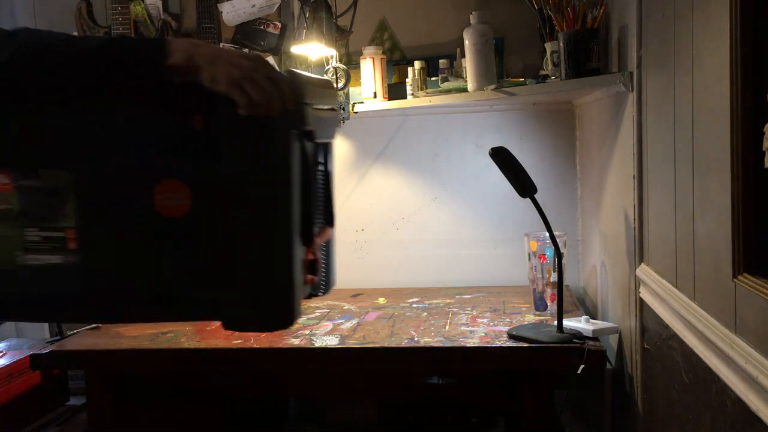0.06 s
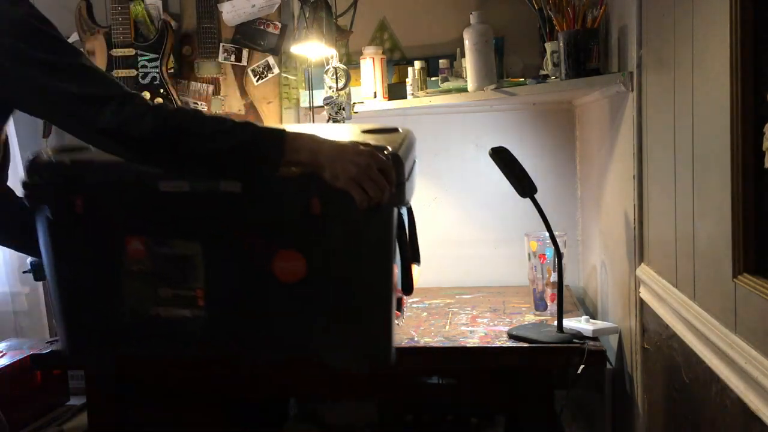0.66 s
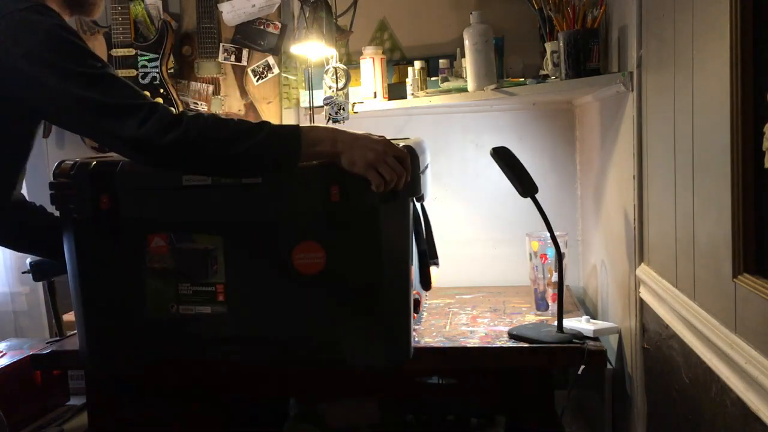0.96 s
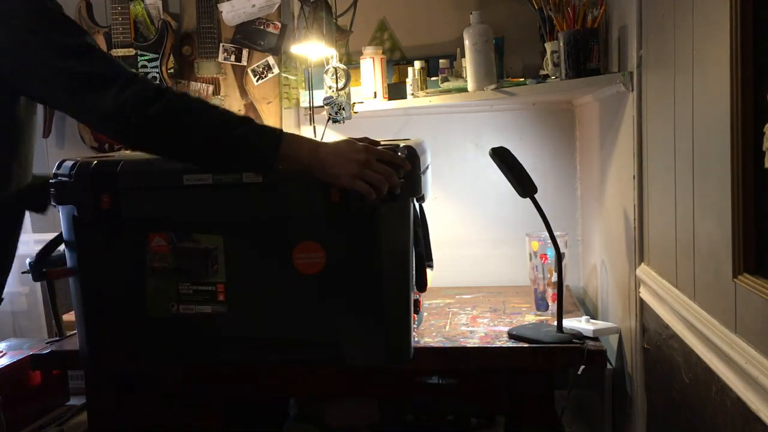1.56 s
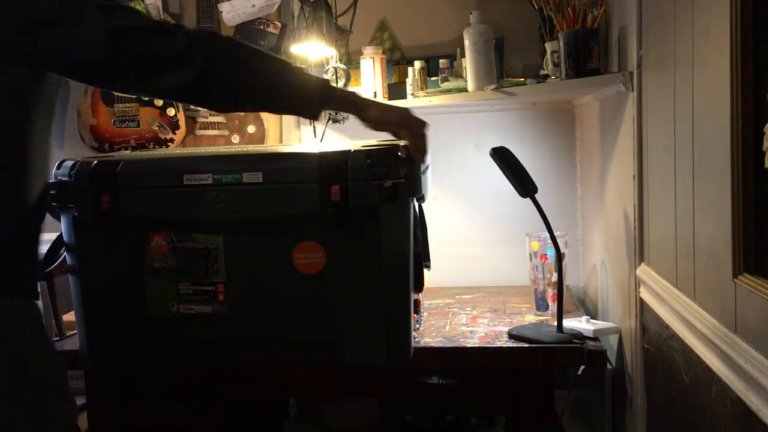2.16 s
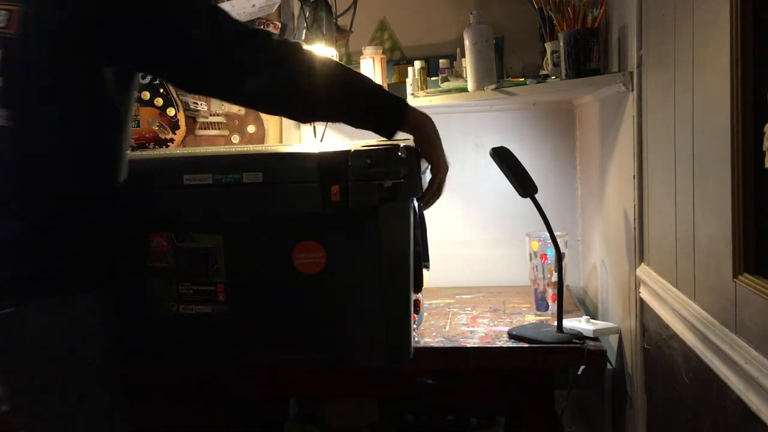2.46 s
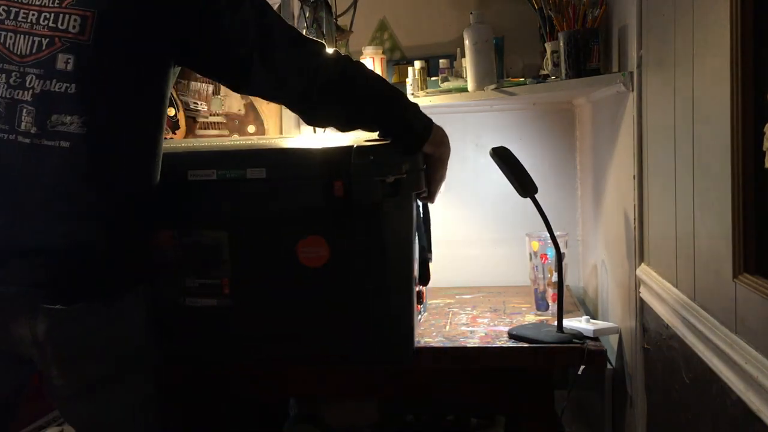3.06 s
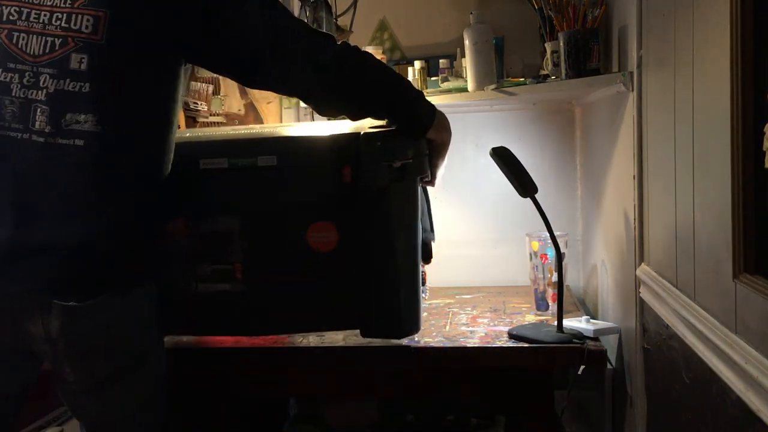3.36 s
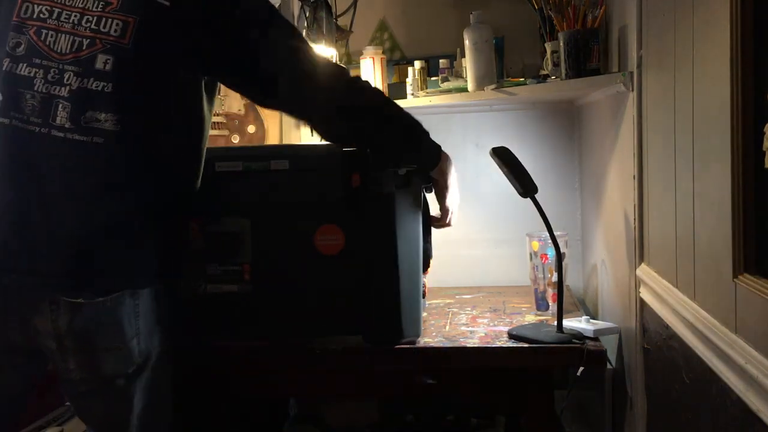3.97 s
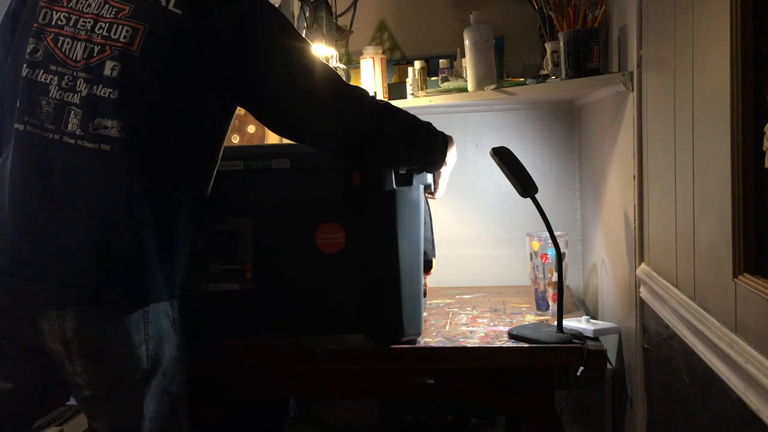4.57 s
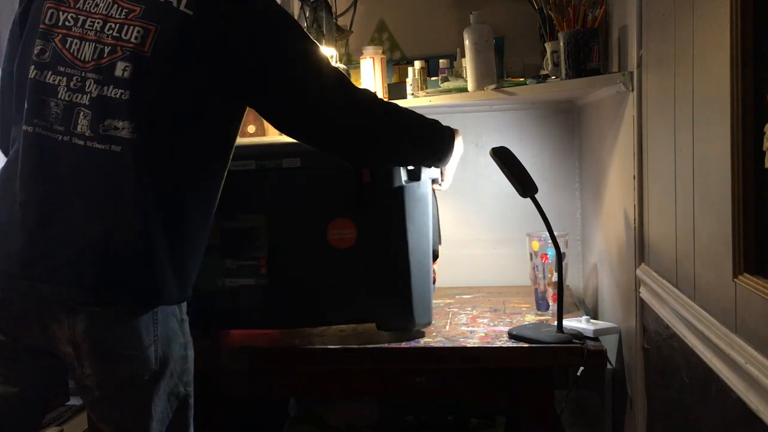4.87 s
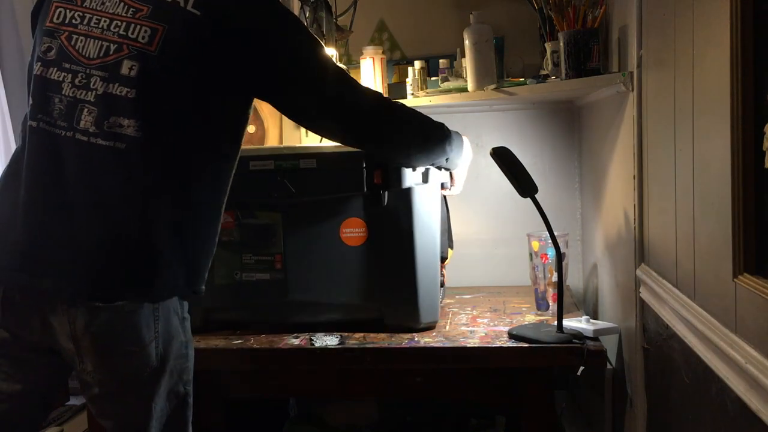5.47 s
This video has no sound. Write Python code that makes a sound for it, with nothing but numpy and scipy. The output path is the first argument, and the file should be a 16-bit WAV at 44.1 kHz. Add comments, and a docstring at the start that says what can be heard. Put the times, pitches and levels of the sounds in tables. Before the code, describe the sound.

A low electric hum and faint room air run throughout, in a small workshop with a short echo. At about 0.7 seconds a heavy hard plastic cooler lands on a wooden workbench in a loud cluster of dull, hollow thumps, with a sharp latch click and a brief juddering scrape, settling by 1 second. From there to about 2.5 seconds come quiet hand knocks on the lid, small clicks and soft rubbing of hands and sleeves. Handles clack lightly against the shell between 2.6 and 3.4 seconds. Around 3.6 seconds the cooler is shoved and lands heavily again, with a low scrape and a handle clack. Lighter hollow knocks, clicks and clacks follow from 4.1 to 4.9 seconds. A last group of heavy thumps with a short rub comes between 5.1 and 5.4 seconds and dies quickly into the hum.

```python
"""Heavy, hollow thumps: a hard plastic cooler is set down on a wooden workbench, then lifted and shoved
twice more. Each landing is a cluster of impacts that excite the modes of the bench and the shell.
Hands knock on the lid, handles clack and latches click, all with the short echo of a small workshop.
Sliding hands and sleeves add friction noise; a low electric hum and faint room air lie underneath."""
import sys
import numpy as np
from scipy import signal
from scipy.fft import rfft, irfft
from scipy.io import wavfile
from scipy.ndimage import uniform_filter1d

SR = 44100
rng = np.random.default_rng(int(sys.argv[2]) if len(sys.argv) > 2 else 0)


def unload_audio(sound):
    """Save the sound as a 16-bit wav file, at the path given as the first command line argument."""
    columns = np.transpose(np.atleast_2d(sound))
    # keep every value between -1 and 1, then stretch to whole-number steps
    steps = np.round(np.clip(columns, -1, 1) * 32767)
    wavfile.write(sys.argv[1], SR, steps.astype(np.int16))


N = 243550

EDGES_HZ = 22 * 2 ** np.arange(0, 9.6, .5)   # half-octave bands
CENTRES_HZ = np.sqrt(EDGES_HZ[1:] * EDGES_HZ[:-1])
BOOM_HZ, THUD_HZ, HOLLOW_HZ = (25, 110), (110, 260), (260, 750)
CLACK_HZ, SNAP_HZ = (750, 3500), (3500, 16500)
BLOW_RANGES_HZ = [THUD_HZ, HOLLOW_HZ, CLACK_HZ, SNAP_HZ]
MIDDLE_SPOT_HZ = 300.6   # struck spots pitched above this trade thud for hollow ring
RING_TIME_S = np.arange(SR * 2 // 5) / SR
ATTACK_SAMPLES = SR // 40   # an impact's level is set over this opening stretch


def landings(bank):
    """Impact excitation: the heavy base lands foot by foot and its weight sets the bench booming."""
    # start_s, level_db, boom_db (relative to the level), hardness_db, pitch_hz
    impacts = [(0.7, -23, -6.5, 9, 268), (0.715, -16, 1, 2.5, 329), (0.732, -30, 11.5, 16.5, 149),
               (0.768, -29.5, -17, 11, 260), (0.784, -26, 4, 9, 230), (0.79, -26.5, 2.5, 13.5, 240),
               (0.803, -26, 4, -11.5, 192), (0.871, -31, 0, 0, 240), (0.881, -25, -5, 3, 257),
               (0.925, -29.5, -18, -1, 287), (0.984, -37, -12, 10, 296), (1.005, -33, 3, -20, 310),
               (3.106, -37, -1, -1.5, 391), (3.119, -41, -1, -3, 218), (3.576, -18.5, 0, -5, 287),
               (3.597, -23, -8, 0, 300), (3.623, -27, -3, 5.5, 247), (3.686, -26, 1, -6.5, 199),
               (3.699, -22.5, -4.5, -2, 187), (3.734, -34.5, 4, 12.5, 212), (3.766, -27, -11, -12, 318),
               (4.536, -41.5, 10, -0.5, 156), (4.602, -41, 7.5, -11, 228), (5.123, -43, 3, 5, 370),
               (5.135, -38, 11, -1.5, 246), (5.224, -29.5, -13, -7.5, 190), (5.283, -34.5, 8, 1, 160),
               (5.292, -23, -5, 7, 196), (5.303, -20, -6.5, -21, 230), (5.33, -28.5, -6, 4.5, 192),
               (5.377, -31.5, -2, 4.5, 180)]
    # thud_db, hollow_db, clack_db, snap_db, relative to the level
    balance_db = [-1.72, 0.17, -11, -20.5]
    out = np.zeros(N)
    for start_s, level_db, boom_db, hardness_db, pitch_hz in impacts:
        ringing = body_modes(bank, decay_scale=0.71, crowd_db=-3.0, spread_db=0.5)
        ringing = resonate(coupled_handles(ringing), pitch_hz, q=7.6, boost_db=2.0)
        trade_db = 6.5 * np.log2(pitch_hz / MIDDLE_SPOT_HZ)
        levels_db = [level_db + boom_db, *blow_levels(balance_db, level_db, hardness_db, trade_db)]
        rise_s = rise_time(0.0011, hardness_db)
        add(out, start_s, contact(ringing, [BOOM_HZ, *BLOW_RANGES_HZ], levels_db, rise_s))
    return out


def hand_knocks(bank):
    """Damped impact: a hand rings the hollow shell briefly, too lightly to make the bench boom."""
    # start_s, level_db, hardness_db, pitch_hz
    impacts = [(0.078, -65.5, -6, 270), (1.144, -42.5, -28, 290), (1.286, -41, 1, 445),
               (1.584, -60, 8.5, 447), (1.784, -60, 6, 445), (1.861, -47, -11, 268),
               (1.897, -40, -14.5, 325), (1.925, -49, -18, 308), (2.023, -53.5, -7, 245),
               (2.215, -54.5, -3.5, 334), (2.397, -55, -9, 296), (2.535, -50.5, -18, 280),
               (2.622, -51.5, -11, 320), (2.694, -49.5, 5.5, 312), (3.469, -48, 5, 426),
               (3.839, -60, 18, 240), (4.137, -37, 5, 427), (4.176, -32.5, -16, 326),
               (4.392, -41.5, 2.5, 454), (4.415, -39, -24, 289), (4.47, -49, -23, 208)]
    # thud_db, hollow_db, clack_db, snap_db, relative to the level
    balance_db = [-1.2, -0.53, -8, -20.5]
    out = np.zeros(N)
    for start_s, level_db, hardness_db, pitch_hz in impacts:
        ringing = body_modes(bank, decay_scale=0.63, crowd_db=1.0, spread_db=0.0)
        ringing = resonate(coupled_handles(ringing), pitch_hz, q=7.9, boost_db=3.5)
        trade_db = 11 * np.log2(pitch_hz / MIDDLE_SPOT_HZ)
        levels_db = blow_levels(balance_db, level_db, hardness_db, trade_db)
        add(out, start_s, contact(ringing, BLOW_RANGES_HZ, levels_db, rise_time(0.0015, hardness_db)))
    return out


def handle_knocks(bank):
    """Stiff impact favours high modes: a swinging handle hits the shell with more clack than thud."""
    # start_s, level_db, hardness_db, pitch_hz
    impacts = [(2.575, -41, 2.5, 1430), (2.752, -59, 4, 1320), (2.826, -44.5, 0, 1330),
               (2.987, -50.5, -7.5, 1570), (3.117, -41.5, 7, 2250), (3.286, -52.5, -0.5, 1800),
               (3.333, -48, 2.5, 2020), (3.699, -33, 5.5, 1430), (4.537, -47, 1, 1370),
               (4.693, -46.5, 2.5, 1360), (4.805, -45.5, -0.5, 1400)]
    # thud_db, hollow_db, clack_db, snap_db, relative to the level
    balance_db = [-10.5, -4, 0, -16]
    out = np.zeros(N)
    for start_s, level_db, hardness_db, pitch_hz in impacts:
        ringing = body_modes(bank, decay_scale=0.53, crowd_db=4.0, spread_db=3.5)
        ringing = resonate(coupled_handles(ringing), pitch_hz, q=5.6, boost_db=1.0)
        levels_db = blow_levels(balance_db, level_db, hardness_db, trade_db=0)
        add(out, start_s, contact(ringing, BLOW_RANGES_HZ, levels_db, rise_s=0.0014))
    return out


def latch_clicks(bank):
    """Free vibration of small hard parts: latches and fittings snap on the shell and ring high."""
    # start_s, level_db, brightness_db, pitch_hz, t60_s
    clicks = [(0.367, -69.5, -20, 1880, 0.15), (0.791, -31.5, -19, 2950, 0.087),
              (1.013, -53, 6, 1820, 0.15), (1.077, -55, 9, 2600, 0.1), (1.084, -47.5, 9.5, 2270, 0.12),
              (1.092, -44, -0.5, 3840, 0.15), (1.267, -49.5, -8.5, 2220, 0.12), (1.392, -53, 9, 4670, 0.13),
              (1.428, -51.5, -4.5, 1890, 0.13), (1.732, -62.5, -5, 1750, 0.22), (1.89, -57, 6, 2590, 0.1),
              (2.005, -58.5, -0.5, 1320, 0.11), (2.133, -61, -8, 1650, 0.071),
              (2.374, -62.5, 3, 1880, 0.19), (2.577, -45.5, -7.5, 3580, 0.095),
              (3.448, -52, 6.5, 3170, 0.25), (3.479, -52, 15, 4060, 0.16), (3.946, -49, -1, 2320, 0.18),
              (4.113, -57.5, 1, 2170, 0.26), (4.379, -55, -3.5, 3050, 0.05), (4.454, -50, 3, 3760, 0.19),
              (4.75, -58.5, -11, 3240, 0.14), (4.906, -57, -2, 2950, 0.14)]
    # spectrum of the fittings: frequency_hz, density_db
    spectrum = [(700, -4), (1700, 1), (2300, 3.5), (2750, 3), (3300, 2), (4200, -4.5), (5200, -2),
                (6500, -4.5), (7600, -2), (8700, -3.5), (11000, -11), (15000, -17)]
    # clack_db, snap_db, top_db, relative to the level
    balance_db = [1.45, -3.5, -25]
    # part of the brightness each range receives: clack_share, snap_share, top_share
    brightness_share = [0, 0.81, 1.96]
    ranges_hz = [CLACK_HZ, (3500, 9000), (9000, 16500)]
    out = np.zeros(N)
    for start_s, level_db, brightness_db, pitch_hz, t60_s in clicks:
        ringing = resonate(crowded_modes(bank, spectrum, t60_s), pitch_hz, q=11.0, boost_db=3.5)
        levels_db = level_db + np.array(balance_db) + brightness_db * np.array(brightness_share)
        add(out, start_s, contact(ringing, ranges_hz, levels_db, rise_s=0.00031))
    return out


def body_modes(bank, decay_scale, crowd_db, spread_db):
    """Modal superposition: struck bench and cooler ring as damped sines over a crowd of dense modes."""
    # bench top, enclosed air and wall panels: frequency_hz, level_db, t60_s (before decay_scale)
    modes = [(39.6, -2.5, 0.47), (49, -1.5, 0.92), (59.4, 0.5, 0.42), (95.5, 4.5, 0.14), (130.7, -8, 0.32),
             (171.7, -2, 0.35), (196.2, -3.5, 0.42), (244.7, -6.5, 0.061), (297.7, -5.5, 0.25),
             (344.3, 6.5, 0.087), (436.6, -7, 0.29), (499, -0.5, 0.13), (538, -6, 0.053), (592, -7.5, 0.28),
             (667.6, -20.5, 0.63), (1084, -13.5, 0.06), (1090, -12.5, 0.11), (1338, -6, 0.11),
             (1590, -9.5, 0.21), (1770, -19.5, .14), (1805, -15, 0.097), (2000, -13, 0.28),
             (2223, -17, 0.16), (2180, -30.5, 0.089), (2560, -42, 0.065), (3092, -14.5, 0.16),
             (3360, -25.5, 0.037)]
    # dense modes of shell and bench: frequency_hz, density_db
    crowd_spectrum = [(30, -8.5), (55, 4.5), (100, -0.5), (300, -8.5), (550, -12.5), (850, -15),
                      (1500, -15.5), (2300, -20.5), (3100, -28), (4700, -54.5), (6300, -51), (9000, -51.5),
                      (15000, -57)]
    # their decay: frequency_hz, t60_s (before decay_scale)
    crowd_decay = [(40, 0.2), (300, 0.24), (1500, 0.31), (5000, 0.12), (15000, 0.2)]
    hz, level_db, t60_s = np.transpose(modes)
    # the bench is always pushed the same way; the wall panels may start in or out
    sign = np.where(hz < THUD_HZ[1], 1, rng.choice([-1, 1], len(hz)))
    strength = sign * from_db(level_db + spread_db * rng.standard_normal(len(hz)))
    decays = fade(RING_TIME_S, decay_scale * t60_s[:, None])
    tones = strength @ (np.sin(2 * np.pi * hz[:, None] * RING_TIME_S) * decays)
    crowd = crowded_modes(bank, crowd_spectrum, decay_scale * at_hz(crowd_decay, CENTRES_HZ))
    return unit_attack(tones) + from_db(crowd_db) * crowd


def crowded_modes(bank, spectrum, t60_s):
    """Modal overlap: modes too close to tell apart ring like decaying bands of noise."""
    start = rng.integers(N - len(RING_TIME_S))
    rings = bank[:, start:start + len(RING_TIME_S)] * fade(RING_TIME_S, np.reshape(t60_s, (-1, 1)))
    return unit_attack(from_db(at_hz(spectrum, CENTRES_HZ)) @ rings)


def coupled_handles(ringing):
    """Sympathetic vibration: a blow on the shell also shakes the handles and their fittings."""
    # frequency_hz, width_hz, boost_db
    resonances = [(1399, 140, -6.5), (1797, 46, -7.5), (2273, 350, -11), (3250, 85, -19), (3510, 110, -9),
                  (6420, 1200, 6), (9000, 690, 4.5)]
    for hz, width_hz, boost_db in resonances:
        ringing = resonate(ringing, hz, hz / width_hz, boost_db)
    return ringing


def resonate(x, hz, q, boost_db):
    """Resonance: a part reinforces the vibration near its own pitch."""
    return x + from_db(boost_db) * signal.lfilter(*signal.iirpeak(hz, q, fs=SR), x)


def contact(ringing, ranges_hz, levels_db, rise_s):
    """Finite contact time: the ringing builds up with the force, each range to its own level."""
    build_up = (1 - np.exp(-RING_TIME_S / rise_s)) ** 2
    die_out = 1 - (RING_TIME_S / RING_TIME_S[-1]) ** 10
    blow = ringing * build_up * die_out
    return sum(from_db(db) * unit_attack(band(blow, edges)) for edges, db in zip(ranges_hz, levels_db))


def blow_levels(balance_db, level_db, hardness_db, trade_db):
    """Spectral tilt: a harder contact lifts the upper ranges; the trade turns thud into hollow ring."""
    # part of the hardness each range receives: thud_share, hollow_share, clack_share, snap_share
    hardness_share = [0, 0.16, 0.68, 1]
    tilt_db = hardness_db * np.array(hardness_share) + trade_db * np.array([-1, 1, 0, 0])
    return level_db + np.array(balance_db) + tilt_db


def rise_time(usual_s, hardness_db, halving_db=38):
    """Contact stiffness: the harder the contact, the sooner its force builds."""
    return usual_s * 2 ** (-hardness_db / halving_db)


def rubbing():
    """Sliding friction: hands and base judder and scuff on plastic and wood while sleeves rustle."""
    # start_s, length_s, level_db, pressure_db (judder offset), sleeve_db (rustle offset)
    strokes = [(0, 0.027, -63.5, -2.5, -11), (0.578, 0.079, -65.5, 2, 4), (0.64, 0.055, -56, -4, 9),
               (0.76, 0.17, -43, 9.5, -6), (1.029, 0.07, -53, 6, 7), (1.296, 0.22, -60.5, 2.5, 3),
               (1.506, 0.2, -64, -1, 5.5), (1.863, 0.18, -69, 13, 9), (2.076, 0.061, -60.5, 3, 5.5),
               (2.186, 0.091, -64, 8, 7), (2.48, 0.18, -61, 7.5, 8), (2.762, 0.087, -63.5, 4, -4),
               (2.96, 0.044, -65, 1, -9), (3.362, 0.13, -55, -4, 0), (3.462, 0.048, -62.5, -12, 13.5),
               (3.57, 0.2, -43, 10.5, -2), (3.84, 0.19, -64, -10, 6), (4.076, 0.05, -54, -4, 0),
               (4.137, 0.14, -54.5, 5.5, -2.5), (4.303, 0.16, -60, -10, -5.5), (4.68, 0.2, -70.5, 3.5, 0),
               (5.148, 0.16, -54, 2, -6), (5.295, 0.14, -57.5, 14, 9)]
    # low rub under pressure: frequency_hz, density_db
    judder_spectrum = [(150, -0.5), (240, -3.5), (310, -1.5), (420, -7), (510, -13.5), (620, -8.5),
                       (900, -33.5), (2000, -27.5)]
    # midrange scrape: frequency_hz, density_db
    scuff_spectrum = [(500, 1.5), (900, 6), (1450, 5.5), (1800, 4), (2300, 5), (3300, -21), (5000, -40)]
    # hiss of sleeves: frequency_hz, density_db
    cloth_spectrum = [(2500, 6), (3900, 4.5), (5000, -7.5), (6400, -1), (9500, -8.5), (11000, -9.5),
                      (15000, -9)]
    compression = 0.72   # sleeves and finger catches swing less in level than the scuff
    sliding, pressing, sleeves = np.zeros((3, N))
    for start_s, length_s, level_db, pressure_db, sleeve_db in strokes:
        motion = from_db(level_db) * stroke(start_s, length_s)
        sliding = np.maximum(sliding, motion)
        pressing = np.maximum(pressing, from_db(pressure_db) * motion)
        sleeves = np.maximum(sleeves, from_db(sleeve_db) * motion ** compression)
    judder = pressing * friction(judder_spectrum, slips_per_s=600, smooth=1.0, uneven_db=3.0)
    scuff = sliding * friction(scuff_spectrum, slips_per_s=3500, smooth=1.4, uneven_db=2.5)
    ticks = sliding ** compression * finger_catches()
    rustle = sleeves * friction(cloth_spectrum, slips_per_s=1400, smooth=1.5, uneven_db=3.5)
    return judder + from_db(-2.45) * scuff + from_db(-26) * ticks + from_db(-28.5) * rustle


def stroke(start_s, length_s, grip_s=0.02):
    """Amplitude envelope of one slide: it swells, holds and dies away."""
    t = np.arange(N) / SR - start_s
    return np.clip(t / grip_s, 0, 1) * fade(np.maximum(t - length_s, 0), t60_s=0.48)


def friction(spectrum, slips_per_s, smooth, uneven_db):
    """Stick-slip: tiny slips over a smooth hiss swell and fade as the grip changes; rms 1."""
    slips = (rng.random(N) < slips_per_s / SR) * rng.standard_normal(N)
    grip = uniform_filter1d(rng.standard_normal(N), size=1500)
    roughness = slips / rms(slips) + smooth * rng.standard_normal(N)
    return coloured(spectrum, roughness * from_db(uneven_db * grip / rms(grip)))


def finger_catches(catches_per_s=20):
    """Shot noise: fingers catch on the texture in sparse, uneven, short-lived ticks; rms 1."""
    ticks = (rng.random(N) < catches_per_s / SR) * rng.uniform(0.23, 1, N)
    envelope = signal.lfilter([1], [1, -fade(1 / SR, t60_s=0.07)], ticks + 1e-18)
    # frequency_hz, density_db
    tick_spectrum = [(500, -6.5), (1000, -2), (2000, 2), (3600, -4.5), (5000, -15.5), (9000, -19.5),
                     (15000, -23.5)]
    return coloured(tick_spectrum, envelope * rng.standard_normal(N))


def workshop(x, wet_db, build_s):
    """Reverberation: echoes from walls and shelves thicken quickly; the top treble dies first."""
    # frequency_hz, t60_s
    room_decay = [(50, 0.46), (300, 0.27), (2000, 0.32), (6000, 0.29), (15000, 0.12)]
    t = np.arange(SR) / SR
    echoes = noise_bank(SR) * fade(t, at_hz(room_decay, CENTRES_HZ)[:, None])
    tail = echoes.sum(axis=0) * (1 - np.exp(-t / build_s)) ** 2
    return x + from_db(wet_db) * signal.fftconvolve(x, tail / np.linalg.norm(tail))[:N]


def motor_hum():
    """Line spectrum: the steady vibration of an electric motor radiates a few low tones."""
    # frequency_hz, rms_db
    tones = [(59.2, -74.5), (118.4, -56), (204.6, -80), (296.1, -79.5)]
    t = np.arange(N) / SR
    return sum(np.sqrt(2) * from_db(db) * np.sin(2 * np.pi * (hz * t + rng.random())) for hz, db in tones)


def room_air(level_db=-59.5):
    """Ambient noise: the still room has a faint continuous spectrum, strongest in the bass."""
    # frequency_hz, density_db
    air_spectrum = [(35, -4.5), (55, 13.5), (80, -14.5), (105, 7.5), (150, -12.5), (210, -8), (290, -15),
                    (400, -19), (1000, -26), (3000, -32), (8000, -39), (15000, -40)]
    return from_db(level_db) * coloured(air_spectrum, rng.standard_normal(N))


def from_db(db):
    """Decibels to amplitude gain."""
    return 10 ** (np.asarray(db) / 20)


def rms(x):
    """Root mean square."""
    return np.sqrt(np.mean(x ** 2) + 1e-20)


def unit_attack(x):
    """Normalise an impact to rms 1 over its attack."""
    return x / rms(x[:ATTACK_SAMPLES])


def at_hz(points, hz):
    """Interpolate a table on a log-frequency axis."""
    points_hz, values = np.transpose(points)
    return np.interp(np.log(hz), np.log(points_hz), values)


def fade(t, t60_s):
    """Exponential decay that loses 60 dB in t60_s."""
    return np.exp(-np.log(1000) * t / np.maximum(t60_s, 1e-3))


def band(x, edges_hz, order=3):
    """Causal band-pass."""
    return signal.sosfilt(signal.butter(order, edges_hz, "band", fs=SR, output="sos"), x)


def noise_bank(size):
    """Half-octave bands of uncorrelated noise, one a row."""
    return np.array([band(rng.standard_normal(size), pair, order=2) for pair in zip(EDGES_HZ, EDGES_HZ[1:])])


def coloured(spectrum, x):
    """Spectral shaping of a steady signal, rolled off beyond the table's ends; rms 1."""
    hz = np.maximum(np.arange(N // 2 + 1) * SR / N, 1)
    roll_off = np.minimum(hz / spectrum[0][0], 1) ** 2 * np.minimum(spectrum[-1][0] / hz, 1) ** 2
    y = irfft(rfft(x) * roll_off * from_db(at_hz(spectrum, hz)), N)
    return y / rms(y)


def add(out, start_s, sound):
    """Mix a sound in at a time."""
    start = round(start_s * SR)
    out[start:start + len(sound)] += sound[:N - start]


def scene():
    """Superposition of reverberant impacts, dry rubbing and background, in one channel."""
    bank = noise_bank(N)
    impacts = landings(bank) + hand_knocks(bank) + handle_knocks(bank) + latch_clicks(bank)
    return (workshop(impacts, wet_db=-17.0, build_s=0.0038) + rubbing() + motor_hum() + room_air())[None]


def record(dry):
    """Band limiting: the microphone loses the deepest bass, and the top is cut steeply."""
    low_hz, high_hz = 33, 15900
    y = signal.sosfilt(signal.butter(4, low_hz, "high", fs=SR, output="sos"), dry)
    return signal.sosfilt(signal.ellip(10, .1, 80, high_hz, fs=SR, output="sos"), y)


dry = scene()
out = record(dry)
unload_audio(out)
```